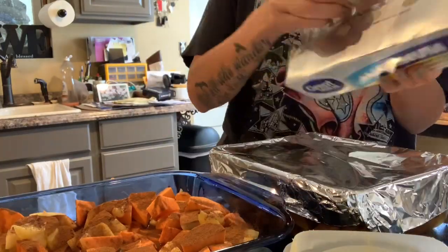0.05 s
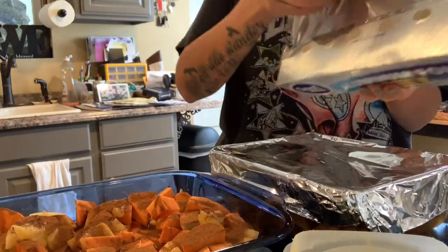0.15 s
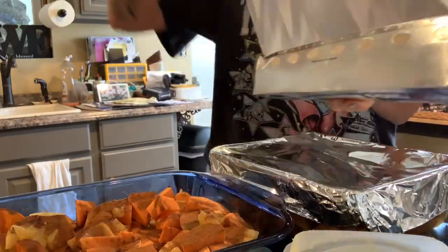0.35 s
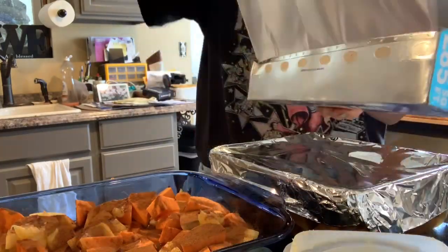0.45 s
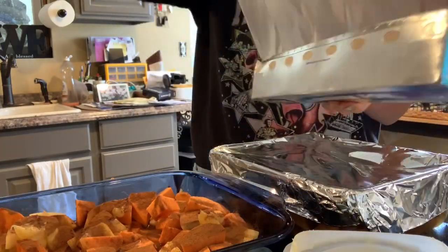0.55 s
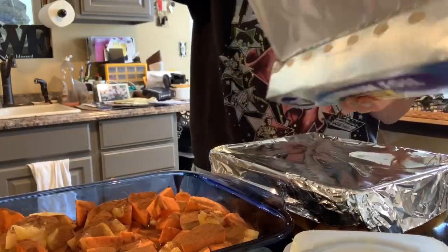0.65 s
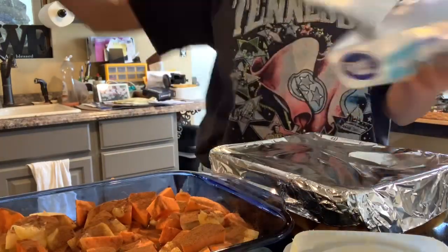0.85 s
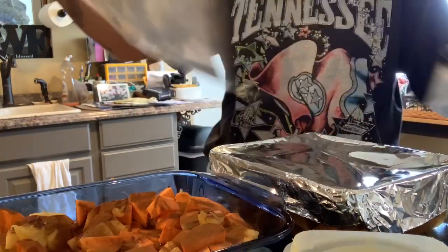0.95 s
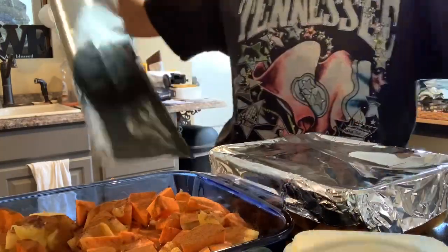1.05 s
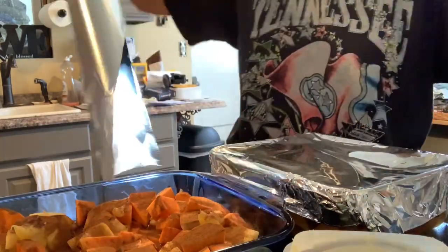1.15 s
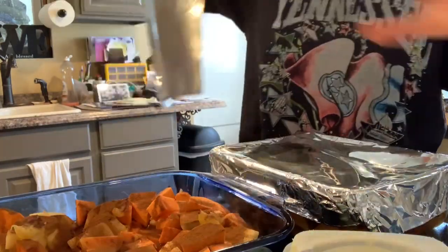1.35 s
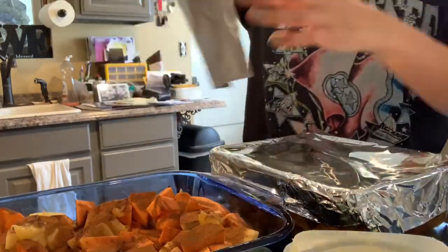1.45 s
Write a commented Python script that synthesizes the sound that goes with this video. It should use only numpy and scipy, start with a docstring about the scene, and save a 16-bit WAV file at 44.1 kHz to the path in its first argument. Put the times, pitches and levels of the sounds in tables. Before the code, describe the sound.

Aluminum foil is pulled from its box and torn, then the box is put down.

```python
"""Aluminium foil is drawn off its roll: countless tiny buckles sizzle and larger creases snap,
while the roll rumbles in its cardboard box. Then the toothed edge rips the foil in a rapid train
of punctures, and the jerked sheet twangs. The loose sheet shivers on as the box is put down with
a dull double thump, which excites the modes of box and counter. Throughout, a small kitchen
reverberates briefly around a close stereo microphone, over faint low noise."""
import sys
import numpy as np
from scipy import signal
from scipy.fft import rfft, irfft, next_fast_len
from scipy.io import wavfile
from scipy.ndimage import uniform_filter1d, map_coordinates

SR = 44100
rng = np.random.default_rng(int(sys.argv[2]) if len(sys.argv) > 2 else 0)


def unload_wav(signal):
    """Save mono or channel-first audio to the path in sys.argv[1] as 16-bit WAV at rate SR, clipped to [-1, 1]."""
    wavfile.write(
        sys.argv[1],
        SR,
        np.round(np.clip(np.atleast_2d(signal).T, -1, 1) * 32767).astype(np.int16),
    )


N = 66150


def amp(db):
    """Decibels to amplitude ratio."""
    return 10 ** (np.asarray(db) / 20)


def unit(x):
    """Normalisation to rms 1."""
    return x / np.sqrt(np.mean(x ** 2) + 1e-20)


def along(points, hz):
    """Interpolation of (Hz, value) points on a log frequency axis."""
    f, v = np.transpose(points)
    return np.interp(np.log(hz + 1), np.log(f + 1), v)


def curve(rows, column=1):
    """Level envelope in dB, interpolated in time and silent outside its rows."""
    rows = np.array(rows)
    return np.interp(np.arange(N) / SR, rows[:, 0], rows[:, column], -120, -120)


def wobble(per_s):
    """Smooth random modulation: a spline through Gaussian knots."""
    return map_coordinates(rng.standard_normal(N // 8), [np.arange(N) * per_s / SR], mode="wrap")


def fade(t, t60):
    """Exponential decay, 60 dB in t60 seconds."""
    return np.exp(-np.log(1000) * t / t60)


def since(start):
    """Seconds elapsed since start, zero before."""
    return np.maximum(np.arange(N) / SR - start, 0)


def filtered(x, response):
    """Filtering as multiplication of the spectrum by a frequency response."""
    m = next_fast_len(N + SR // 2)
    return irfft(rfft(x, m) * response(np.fft.rfftfreq(m, 1 / SR)), m)[..., :N]


def coloured(x, colour):
    """Minimum-phase filtering: folding the cepstrum makes the response causal."""
    m = 2 * N
    cepstrum = irfft(np.log(amp(along(colour, np.fft.rfftfreq(m, 1 / SR)))))
    response = np.exp(rfft(2 * cepstrum[:N], m) - cepstrum[0])
    return irfft(rfft(x, m) * response, m)[..., :N]


# Likeness of left and right. Each row: frequency in Hz, correlation.
CORRELATION = [(100, 0.91), (300, 1), (900, 0.69), (1800, 0.12), (4000, 0.033), (15000, 0.017)]

def stereo(pair):
    """Partial coherence: two independent signals blend toward mono in the bass."""
    angle = lambda hz: np.arcsin(along(CORRELATION, hz)) / 2
    own = filtered(pair, lambda hz: np.cos(angle(hz)))
    return own + filtered(pair[::-1], lambda hz: np.sin(angle(hz)))


def noise(colour):
    """Stationary stereo noise with a shaped spectrum."""
    return stereo(unit(coloured(rng.standard_normal((2, N)), colour)))


def bursts(times, sizes_db, t60):
    """Incoherent summation: decaying noise bursts add in power."""
    hits = np.bincount((np.abs(times) * SR).astype(int), amp(sizes_db) ** 2, N)[:N]
    power = signal.lfilter([1], [1, -fade(1 / SR, t60) ** 2], hits)
    return unit(np.sqrt(power) * rng.standard_normal((2, N)))


def crinkle(colour, per_s, spread_db, t60):
    """Buckling as a Poisson process: countless small snaps, a few much stronger than the rest."""
    gaps, strengths = -np.log(1 - rng.random((N // 4, 2))).T
    times = np.cumsum(gaps) / per_s
    sizes_db = spread_db * np.minimum(strengths, 5)
    return stereo(unit(coloured(bursts(times, sizes_db, t60), colour)))


# Room noise spectrum. Each row: frequency in Hz, relative level in dB.
ROOM_COLOUR = [(25, -12), (55, -8.5), (100, -1.5), (150, -4), (300, -7.5), (800, -18), (3000, -19.5),
               (15000, -31)]
# The hum's envelope. Each row: time in seconds, level in dB.
HUM_LEVELS = [(.55, -56), (.68, -69), (.93, -65), (1.07, -63.5), (1.2, -81)]

def background(room_db=-59.5, hum_hz=199.6):
    """Ambient noise floor, with a faint phase-modulated hum that comes and goes."""
    phase = 2 * np.pi * hum_hz * since(0) + .4 * wobble(10.6)
    hum = amp(curve(HUM_LEVELS)) * unit(np.sin(phase))
    return hum + amp(room_db) * noise(ROOM_COLOUR)


# The kitchen's reverberation time. Each row: frequency in Hz, t60 in seconds.
KITCHEN_T60 = [(120, 1), (400, 0.37), (900, 0.093), (4000, 0.41), (14000, 0.37)]

def kitchen(x, wet_db):
    """Reverberation: convolution adds a diffuse tail whose bass lasts longest."""
    hz, t, spectra = signal.stft(rng.standard_normal((2, N)), SR, nperseg=256)
    decaying = spectra * fade(t, along(KITCHEN_T60, hz)[:, None])
    tail = stereo(signal.istft(decaying, SR, nperseg=256)[1][:, :N])
    tail *= 1 - fade(since(0.0026), 0.0079)  # builds up after a short gap
    tail /= np.linalg.norm(tail[0])
    return x + amp(wet_db) * signal.fftconvolve(x, tail, axes=1)[:, :N]


# Echoes off near surfaces. Each row: left delay and right delay in seconds, gain in dB.
ECHOES = [(.0021, 0.0019, -21), (.0043, 0.0041, -21), (.0068, .0079, -20), (0.0121, 0.013, -17.5)]

def reflections(x):
    """Comb filtering: counter top and cupboards add a few early copies."""
    return filtered(x, lambda hz: 1 + sum(
        amp(db) * np.exp(-2j * np.pi * np.outer([left, right], hz)) for left, right, db in ECHOES))


def ring(modes, t, attack_s):
    """Modal vibration: a sum of damped sinusoids, a little different at every blow."""
    tones = np.zeros(N)
    for hz, db, t60 in modes:
        gain = amp(db + rng.normal(0, 1.13))
        detuned_hz = hz * (1 + rng.normal(0, 0.0032))
        tones += gain * fade(t, t60) * np.sin(2 * np.pi * detuned_hz * t)
    return tones * (1 - np.exp(-t / attack_s))


# Modes of box and counter. Each row: frequency in Hz, relative level in dB, t60 in seconds.
BOX_MODES = [(420, 0, 0.054), (546, -0.5, 0.023), (750, -13, 0.087), (806, -6, 0.1), (874, 1, 0.062),
             (970, -23, 0.032), (1320, -13.5, 0.09), (1860, -8, 0.13), (2570, -10, 0.08), (4260, -1, 0.045)]
COUNTER_MODES = [(99.4, -26.5, 2.2), (120.6, -20, 0.91), (175, -14, 0.155), (258, -12, 0.31),
                 (274.4, -14, 0.87), (315.3, 5, .12), (370.8, -1.5, 0.41), (422, -15.5, 0.63),
                 (590, -25.5, 0.8)]
# Spectrum of slap and rattle. Each row: frequency in Hz, relative level in dB.
CARDBOARD_COLOUR = [(50, -28), (110, -9.5), (200, -6), (320, 4.5), (600, -6), (950, -0.5), (2000, -5),
                    (5000, -4), (14000, -5)]
# The box meets the counter. Each row: start in seconds, contact gain in dB, low-pass cutoff in Hz,
# counter gain in dB, then the struck panel's frequency in Hz, level in dB and t60 in seconds.
IMPACTS = [(1.01, -50, 2225, -88, 466, -40.5, 0.047), (1.072, -53, 1500, -77, 650, -42, 0.033),
           (1.0957, -34, 2980, -75, 1730, -28, .025), (1.1005, -30.5, 1510, -58, 452, -22, 0.035),
           (1.126, -22, 2030, -38.5, 988, -25, 0.019), (1.1362, -23.5, 1540, -31, 842, -21.5, 0.017),
           (1.17, -54, 700, -41, 403, -29, 0.027), (1.213, -40, 3500, -47.5, 733, -40.5, 0.042)]

def knocks():
    """Impact excitation: the box lands corner first, then flat; panels knock and the counter booms."""
    out = np.zeros((2, N))
    for start, contact_db, cutoff_hz, counter_db, panel_hz, panel_db, panel_t60 in IMPACTS:
        t = since(start)
        slap = amp(3) * fade(t, t60=0.039)
        rattle = amp(-1.5) * fade(t, t60=0.14)
        contact = (t > 0) * (slap + rattle) * noise(CARDBOARD_COLOUR)
        contact += amp(-8) * ring(BOX_MODES, t, attack_s=0.0004)
        out += amp(contact_db) * signal.lfilter(*signal.butter(1, cutoff_hz, fs=SR), contact)
        out += ring([(panel_hz, panel_db, panel_t60)], t, attack_s=0.0011)
        out += amp(counter_db) * ring(COUNTER_MODES, t, attack_s=0.005)
    return out


def flexing(x, depth_db):
    """Time-varying filtering: as the sheet bends, its colour shifts in brief random patches."""
    spectra = signal.stft(x, nperseg=512)[2]
    patches = uniform_filter1d(rng.standard_normal(spectra.shape[1:]), size=7, axis=0)
    patches = uniform_filter1d(patches, size=9, axis=1)
    return signal.istft(spectra * amp(depth_db * unit(patches)), nperseg=512)[1][:, :N]


# Resonances of the bent sheet. Each row: centre in Hz, width in Hz, boost in dB.
FOIL_RESONANCES = [(787, 118, 5), (1770, 67, 2.5), (2530, 480, 2), (2850, 680, 1.5), (3405, 230, 2.5),
                   (4320, 71, 1.5), (5360, 50, 5), (5870, 150, 5), (8200, 170, 7.5), (11060, 170, 1.5),
                   (14400, 520, 9)]

def metallic(x):
    """Resonance: the sheet's bell-shaped spectral peaks give a metallic colour."""
    return filtered(x, lambda hz: amp(sum(
        db / (1 + (2 * (hz - centre) / width) ** 2) for centre, width, db in FOIL_RESONANCES)))


# The loose sheet's envelope. Each row: time in seconds, level in dB.
SHIVER_LEVELS = [(.8, -39), (.86, -44.5), (.895, -48.5), (.92, -43.5), (1.0, -40.5), (1.11, -42.5),
                 (1.165, -46), (1.185, -41), (1.203, -47.5), (1.228, -44.5), (1.27, -59), (1.3, -66),
                 (1.322, -53.5), (1.375, -75), (1.466, -92), (1.478, -39), (1.5, -39.5)]
# Its spectrum. Each row: frequency in Hz, relative level in dB.
SHIVER_COLOUR = [(150, -47), (450, -7.5), (1100, -15), (2000, -5.5), (3000, -5.5), (4800, 4), (8000, 0.5),
                 (13000, 1.5), (15500, -12)]

def shiver():
    """Random buckling: the freed sheet shivers in the air."""
    return amp(curve(SHIVER_LEVELS)) * crinkle(SHIVER_COLOUR, per_s=4000, spread_db=2.0, t60=0.017)


# Single creases. Each row: start in seconds, level in dB.
SNAPS = [(0.046, -40), (0.062, -47), (.070, -38), (0.095, -35), (0.099, -41.5), (.136, -38), (0.176, -47),
         (.197, -33), (0.199, -32), (0.311, -30.5), (.692, -27.5), (0.748, -27), (0.801, -24)]
# Their spectrum. Each row: frequency in Hz, relative level in dB.
SNAP_COLOUR = [(150, -1), (800, 1), (2500, -0.5), (4000, -7), (6000, 6.5), (11000, 4), (15500, -2)]

def creases(t60=0.014):
    """Snap-through buckling: each larger fold gives one short noise burst."""
    envelope = sum(amp(db) * (since(start) > 0) * fade(since(start), t60) for start, db in SNAPS)
    return envelope * noise(SNAP_COLOUR)


# Envelopes of the drawn foil and the turning roll. Each row: time in seconds, level in dB.
SIZZLE_LEVELS = [(0, -51), (.03, -52.5), (.07, -42.5), (.084, -49.5), (.12, -48.5), (.155, -49.5),
                 (.19, -39), (.25, -38.5), (.41, -36.5), (.455, -35.5), (.54, -34.5), (.648, -36),
                 (.68, -45.5), (.694, -35.5), (.745, -35), (.8, -28), (.85, -94)]
RUMBLE_LEVELS = [(0, -77), (.04, -62), (.17, -68), (.25, -45), (.33, -54.5), (.405, -47.5), (.46, -54.5),
                 (.55, -48.5), (.65, -77), (.72, -51.5), (.8, -74)]
# Their spectra. Each row: frequency in Hz, relative level in dB.
SIZZLE_COLOUR = [(150, -32), (400, -9.5), (800, -7.5), (1200, -10), (2300, -5), (3900, -6), (5800, 1),
                 (8000, -1), (13500, -0.5), (15500, -40)]
RUMBLE_COLOUR = [(40, -51), (100, -9), (160, -7), (225, 0), (300, -6.5), (370, -13.5), (800, -18.5),
                 (1300, -21.5), (4000, -73)]

def pull():
    """Dense buckling makes the peeling foil sizzle; the roll's bumps modulate its rumble in the box."""
    sizzle = amp(curve(SIZZLE_LEVELS)) * crinkle(SIZZLE_COLOUR, per_s=7300, spread_db=3.0, t60=0.024)
    bumps_db = 3.6 * wobble(45.2)
    return sizzle + amp(curve(RUMBLE_LEVELS) + bumps_db) * noise(RUMBLE_COLOUR)


# Notes of the jerked foil, tending lower as the tear frees it.
# Each row: start in seconds, frequency in Hz, level in dB, t60 in seconds.
FOIL_NOTES = [(.771, 2320, -21, 0.04), (.776, 1437, -25.5, 0.051), (.793, 2317, -22.5, 0.065),
              (.821, 2383, -22, 0.035), (.822, 1640, -34.5, 0.074), (.829, 2200, -20, 0.055),
              (.835, 1864, -23, 0.046), (.841, 1670, -28.5, 0.069), (1.471, 2800, -45, .25)]

def twangs(attack_s=0.00067, roughness_rad=0.94):
    """Damped free vibration of the stretched foil, roughened by random phase modulation."""
    out = np.zeros((2, N))
    for start, hz, db, t60 in FOIL_NOTES:
        t = since(start)
        phase = 2 * np.pi * hz * t + roughness_rad * np.array([wobble(270), wobble(450)])
        out += amp(db) * (1 - np.exp(-t / attack_s)) * fade(t, t60) * np.sin(phase)
    return out


# The rip's envelopes. Each row: time in seconds, foil level in dB, box level in dB.
RIP_LEVELS = [(.72, -64, -62), (.7475, -39, -54), (.75, -26, -28), (.768, -27.5, -40), (.778, -24.5, -35.5),
              (.8, -29, -36.5), (.808, -28.5, -38.5), (.835, -30, -51.5), (.85, -38.5, -51),
              (.875, -62, -95)]
# Spectra of the tearing foil and the shaken box. Each row: frequency in Hz, relative level in dB.
TEAR_COLOUR = [(200, -38.5), (700, -1), (1250, 3.5), (1500, 8.5), (2400, 5.5), (3600, 1.5), (6000, 4.5),
               (13000, 1.5), (15500, -17)]
BOX_COLOUR = [(50, -78), (120, -8), (220, -8), (290, 3), (410, -12.5), (670, -2), (790, 2), (1100, -1),
              (2000, -6.5), (5000, -35)]

def rip(teeth_per_s=650, scatter_s=.0004, spread_db=1.5):
    """Forced vibration: tooth after tooth punctures the foil, and each jerk also shakes the box."""
    timing, strength = rng.standard_normal((N // 32, 2)).T
    times = np.arange(len(timing)) / teeth_per_s + scatter_s * timing
    punctures = stereo(bursts(times, spread_db * strength, t60=0.016))
    foil = amp(curve(RIP_LEVELS)) * unit(coloured(punctures, TEAR_COLOUR))
    box = amp(curve(RIP_LEVELS, column=2)) * unit(coloured(punctures, BOX_COLOUR))
    return foil + box


# Stereo balance of foil and box. Each row: frequency in Hz, left minus right level in dB.
BALANCE = [(100, -0.5), (400, -1.5), (900, -1), (1800, -5), (4000, -0.5), (8000, -1.7), (15000, 1)]

def scene():
    """Superposition: foil and box, a little to the right, add to the quiet kitchen's noise."""
    foil = reflections(metallic(pull() + creases() + rip() + shiver())) + twangs()
    foil = flexing(kitchen(foil, wet_db=-19.5), depth_db=1.5)
    box = kitchen(knocks(), wet_db=-15)
    panned = filtered(foil + box, lambda hz: amp(np.outer([.5, -.5], along(BALANCE, hz))))
    return panned + background()


def record(dry):
    """Band limiting and arrival time: deep bass and top treble are cut, and the left channel lags."""
    low_cut_hz, top_hz, left_lag_s = 92, 15200, .0002
    cut = signal.sosfilt(signal.butter(4, low_cut_hz, "high", fs=SR, output="sos"), dry)
    return filtered(cut, lambda hz: (hz < top_hz) * np.exp(np.pi * np.outer([-1j, 1j], hz * left_lag_s)))


dry = scene()
out = record(dry)
unload_wav(out)
```